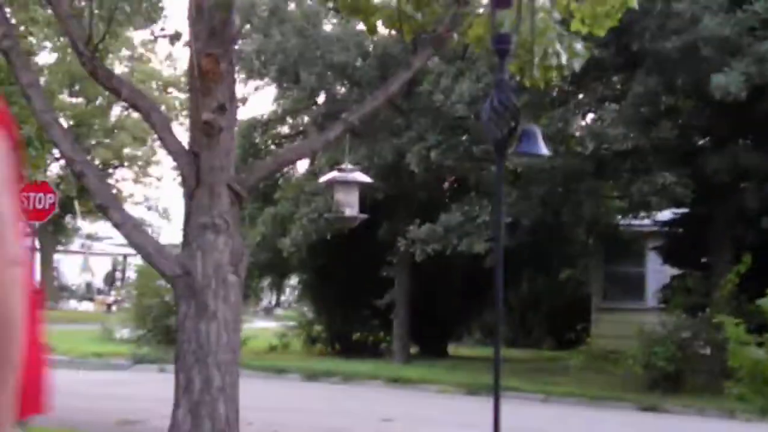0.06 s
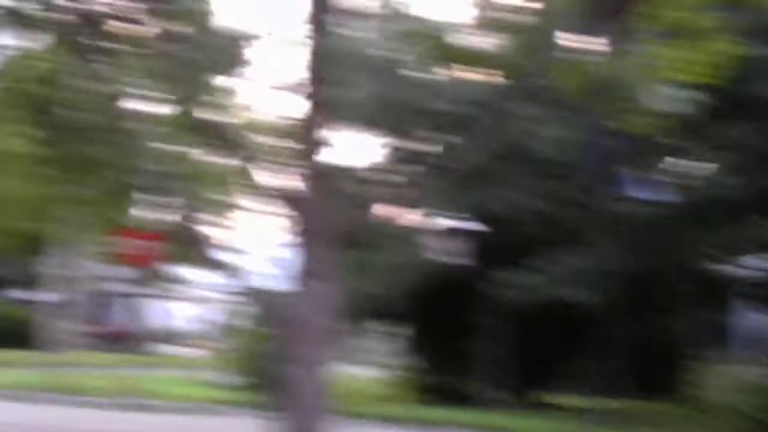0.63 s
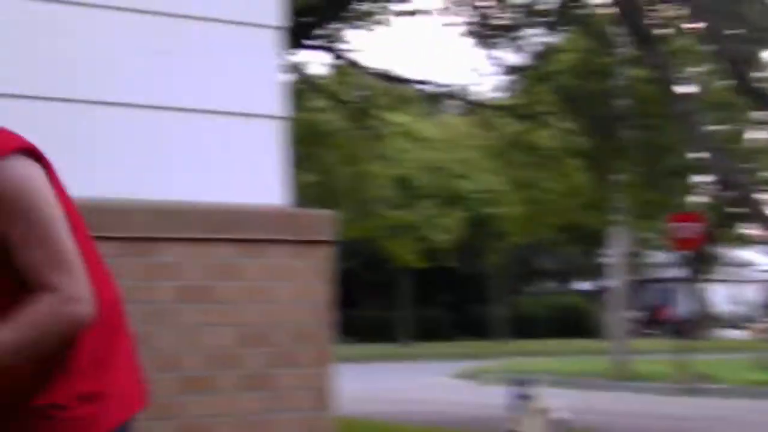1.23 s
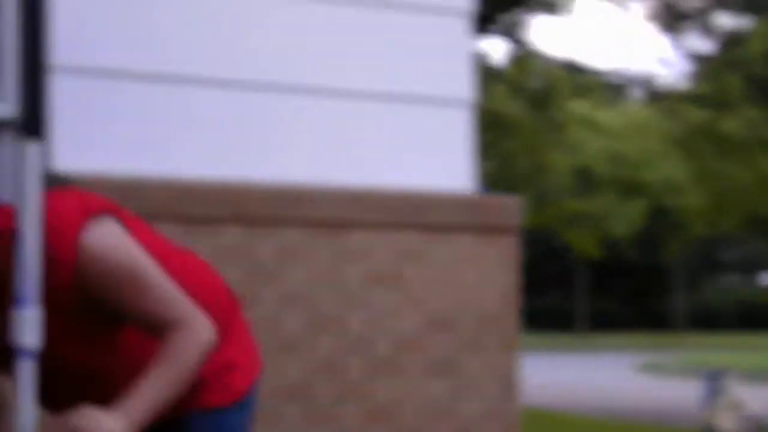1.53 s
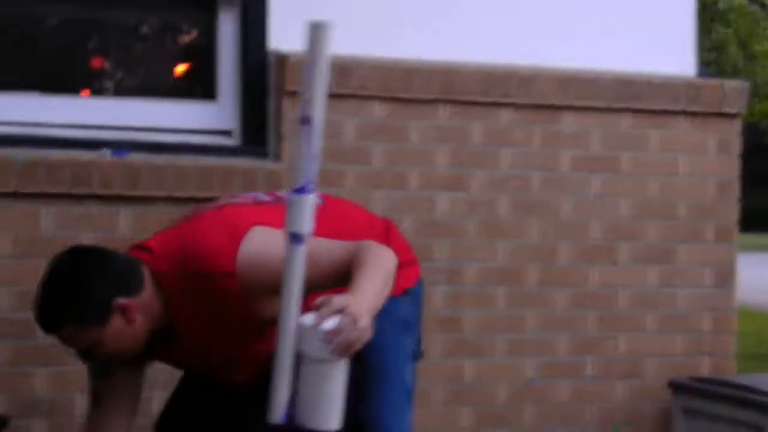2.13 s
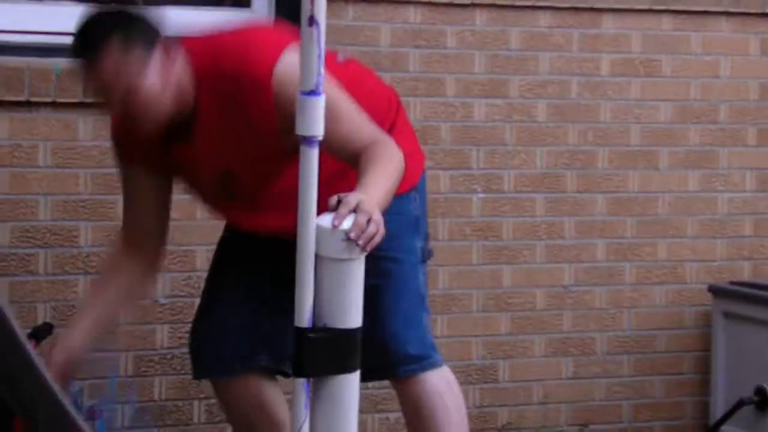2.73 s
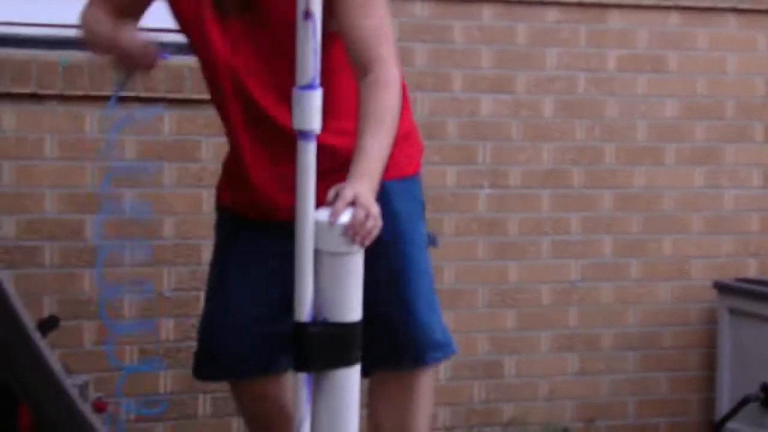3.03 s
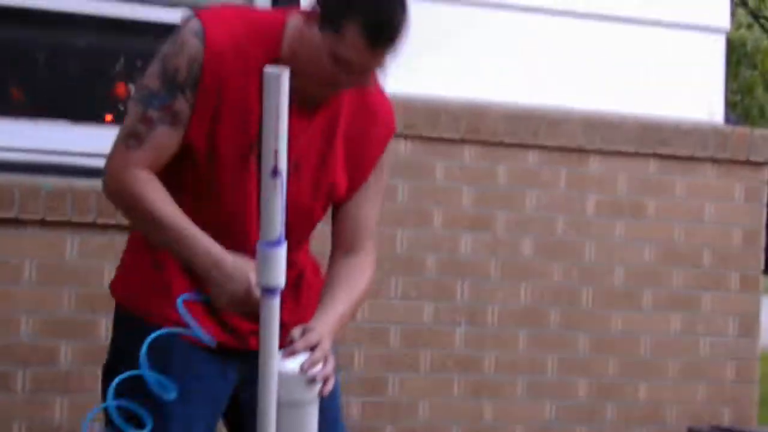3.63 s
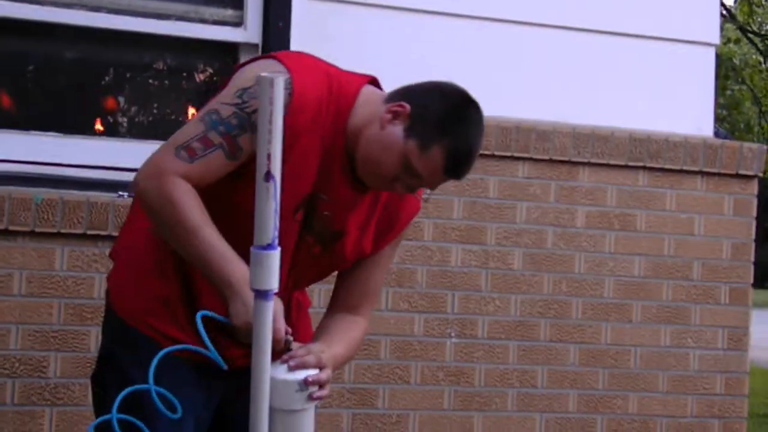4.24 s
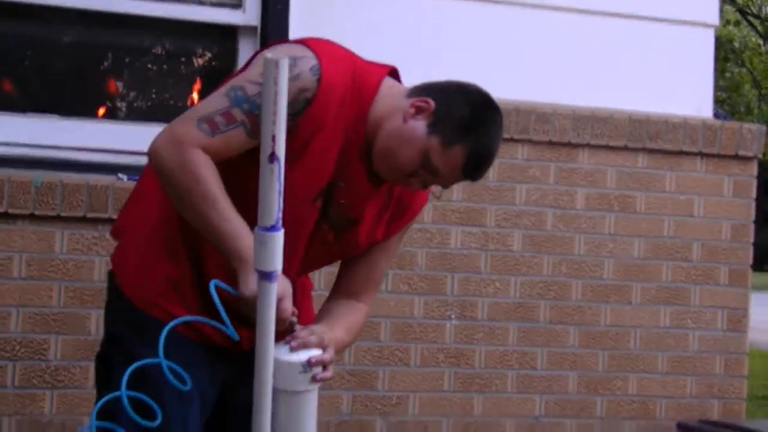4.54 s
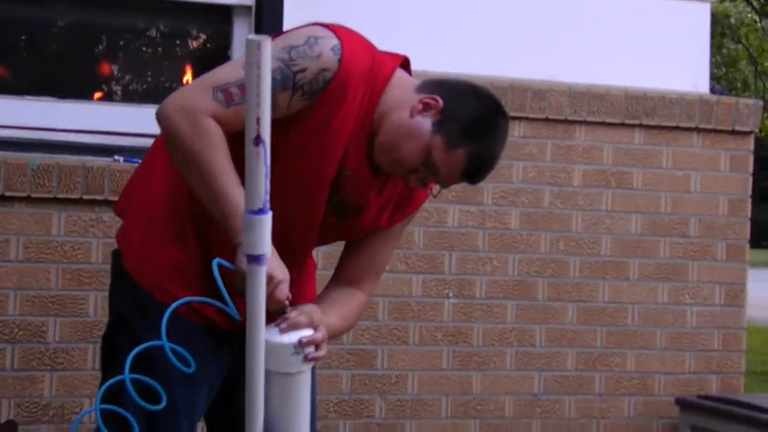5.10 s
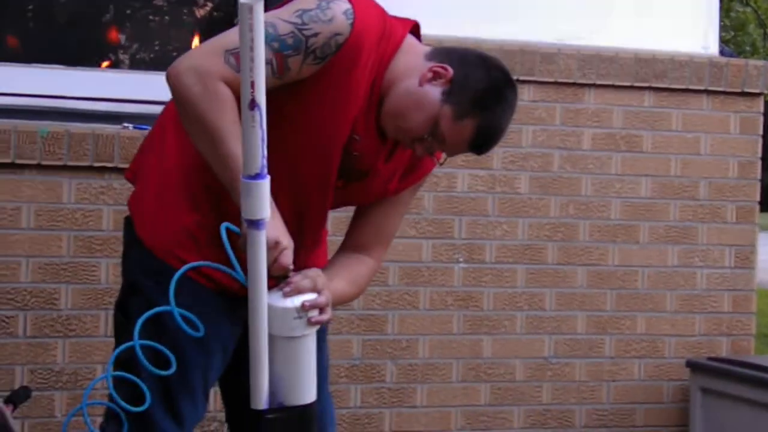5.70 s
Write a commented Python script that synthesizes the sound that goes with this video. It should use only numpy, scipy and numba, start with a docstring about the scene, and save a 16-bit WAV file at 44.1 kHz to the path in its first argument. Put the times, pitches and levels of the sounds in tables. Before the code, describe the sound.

Steady buzz and bright metallic rattle of an electric air compressor, with a few clicks and late spurts of escaping air.

```python
"""Small air compressor by a wall

A piston compressor runs outdoors beside a brick wall, about 87 strokes a second, while a hand-held
camera swings round to face it. The pump buzzes, its valve rings, its gear rattles and air rushes with
each stroke. Near the end air spits from the hose chuck as it is pressed on a pipe cannon, and the
camera's gain control ducks."""
import sys
import numpy as np
from scipy import signal
from scipy.fft import rfft, irfft, next_fast_len
from scipy.io import wavfile
from scipy.ndimage import uniform_filter1d
from numba import njit

SR = 44100
rng = np.random.default_rng(int(sys.argv[2]) if len(sys.argv) > 2 else 0)


def persist_wave(psi):
    """Save psi, clipped to +-1, as 16-bit WAV."""
    counts = np.round(np.clip(psi, -1, 1) * 32767).astype(np.int16)
    wavfile.write(sys.argv[1], SR, np.atleast_2d(counts).T)


N = 262836
T = np.arange(N) / SR


def undb(db):
    """Decibels to gain."""
    return 10 ** (np.asarray(db) / 20)


def unit(x):
    """Scale to rms 1."""
    return x / np.sqrt(np.mean(x ** 2))


def automation(points):
    """Straight ramps through (time, value) breakpoints."""
    return np.interp(T, *np.transpose(points))


def equalise(x, points):
    """Shape x with a (frequency, gain) EQ curve; rms 1."""
    hz, db = np.transpose(points)
    size = next_fast_len(N)
    bins_hz = np.maximum(np.fft.rfftfreq(size, 1 / SR), 1)
    gain = undb(np.interp(np.log(bins_hz), np.log(hz), db))
    return unit(irfft(rfft(x, size) * gain, size)[:N])


def resonate(x, hz, width_hz):
    """One resonance, gain 1 at its centre."""
    return signal.lfilter(*signal.iirpeak(hz, hz / width_hz, fs=SR), x)


def ring(knocks, hz, width_hz):
    """A struck metal part: the knocks pass twice through one resonance; rms 1."""
    return unit(resonate(resonate(knocks, hz, width_hz), hz, width_hz))


def drift(rate_hz):
    """Smooth random modulation, gliding between values of spread 1."""
    targets = rng.standard_normal(1024)
    step, fraction = np.divmod(T * rate_hz, 1)
    k = step.astype(int) % (len(targets) - 1)
    return targets[k] + (targets[k + 1] - targets[k]) * (1 - np.cos(np.pi * fraction)) / 2


def strokes(turns, jitter_s, scatter_db):
    """One sharp knock a turn, each a little early or late and of its own size."""
    count = int(turns[-1])
    lateness, size = rng.standard_normal((count, 2)).T
    position = (np.interp(np.arange(count), turns, T) + jitter_s * lateness) * SR
    taps = position.astype(int)[:, None] + np.arange(-7, 9)
    pulses = undb(scatter_db * size)[:, None] * np.sinc(taps - position[:, None])
    knocks = np.zeros(N)
    np.add.at(knocks, np.clip(taps, 0, N - 1), pulses)
    return knocks


# Motor speed: (time [s], stroke rate [Hz])
STROKE_RATE = [(0, 86.65), (.36, 87.03), (.9, 86.6), (1.08, 86.24), (1.35, 86.73), (2.28, 87.2),
               (2.55, 86.34), (2.75, 86.6), (2.95, 86.27), (3.7, 86.76), (4.12, 86.96), (4.4, 86.43),
               (4.8, 86.15), (5.4, 86.2), (5.65, 86.7), (5.96, 87)]

def crank():
    """Turns made so far by the crank, which sags a little under load."""
    return np.cumsum(automation(STROKE_RATE)) / SR


# The camera tips down towards the pump and back up: (time [s], aim [0-1])
CAMERA_AIM = [(1.5, 0.16), (2.05, 0.99), (3.05, 0.71), (3.7, 0.01)]

def perspective(away_db, facing_db, aimed_db=0, swing_start_s=1.08, swing_length_s=.65):
    """A layer's level in dB as the camera swings to face the wall and tips towards the pump."""
    facing = np.clip((T - swing_start_s) / swing_length_s, 0, 1)
    return away_db + (facing_db - away_db) * facing + aimed_db * automation(CAMERA_AIM)


def camera_shadow(x, above_hz=13100):
    """The camera's body shades the top of the treble, most while it is turned away."""
    top = signal.sosfiltfilt(signal.butter(4, above_hz, "high", fs=SR, output="sos"), x)
    return x + top * (undb(perspective(away_db=-12.5, facing_db=-8.2)) - 1)


def wall_echo(x, delay_s=.0022, sway_s=.000095, gain=.061):
    """The wall's reflection sways with the hand, a faint moving comb filter on the hiss."""
    reflection = np.interp(T - delay_s - sway_s * drift(2.5), T, x)
    return (x + gain * reflection) / np.sqrt(1 + gain ** 2)


# Handling hits: (time [s], peak [dB], pitch [Hz], bandwidth [Hz], decay [s])
HANDLING_HITS = [(1.642, -14, 2020, 398.7, 0.0051), (1.99, -30, 400, 700, 0.0055),
                 (5.007, -7, 8490, 7030, 0.0018), (5.538, -9, 11000, 5000, 0.0036)]

def handling_clicks():
    """The gear clicks as it is handled, each hit a noise burst into one resonance."""
    out = 0
    for start_s, peak_db, hz, width_hz, decay_s in HANDLING_HITS:
        envelope = (T >= start_s) * np.exp(-np.minimum(np.abs(T - start_s) / decay_s, 20))
        click = resonate(rng.standard_normal(N) * envelope, hz, width_hz)
        out = out + undb(peak_db) * click / np.abs(click).max()
    return out


# Partials of the whine: (harmonic [x stroke rate], level [dB], flutter depth [dB])
WHINE_PARTIALS = [(31, -39.5, 1), (66, -45, 4)]
# Fader ride on the whine: (time [s], gain [dB])
WHINE_FADER = [(0, 5), (.6, 5), (1.05, 0.5), (1.45, 10), (2.6, -12), (3.65, 2.5), (4.6, -2), (5.2, -15),
               (5.95, -2)]

def motor_whine(turns):
    """Two high partials of the motor, the upper one fluttering more."""
    out = 0
    for harmonic, db, flutter_db in WHINE_PARTIALS:
        flutter = undb(flutter_db * drift(90))
        tone = np.sin(2 * np.pi * (harmonic * turns + rng.random()))
        out = out + undb(db) * unit(flutter * tone)
    return out * undb(automation(WHINE_FADER))


# Fader ride on the housing's ring: (time [s], gain [dB])
HOUSING_FADER = [(0, -3), (2.2, -3.5), (2.42, 6), (2.68, -9), (3.5, -1), (4.35, 6), (4.75, -2), (5.3, -5),
                 (5.95, 4)]

def housing_ring(turns, trim_db=-37):
    """The piston's return rings the housing, half a turn after each valve slap."""
    knocks = strokes(turns + .5, jitter_s=.000012, scatter_db=1.2)
    return ring(knocks, hz=3118, width_hz=123) * undb(automation(HOUSING_FADER) + trim_db)


def valve_squeak(turns):
    """A thin, ragged squeak from the valve gap on each stroke, strongest before the camera turns."""
    kicks = strokes(turns - .7, jitter_s=.00004, scatter_db=3.5)
    squeak = ring(kicks, hz=10550, width_hz=400) + ring(kicks, hz=11000, width_hz=180)
    return unit(squeak) * undb(perspective(away_db=-30.5, facing_db=-38, aimed_db=2))


# Fader ride on the valve plate's ring: (time [s], gain [dB])
VALVE_FADER = [(0.0, -27), (0.51, -30), (0.81, -26), (1.03, -43), (1.21, -30), (1.68, -30), (1.76, -36.5),
               (2.42, -30.5), (2.92, -38), (3.27, -32), (3.37, -24), (3.42, -33), (3.82, -27.5),
               (4.61, -32), (4.93, -48), (5.18, -29), (5.53, -32.5), (5.96, -28)]

def valve_ring(turns, trim_db=1.5):
    """The valve plate slaps shut once a stroke and rings."""
    slaps = strokes(turns, jitter_s=.000012, scatter_db=1.66)
    return ring(slaps, hz=3977, width_hz=155) * undb(automation(VALVE_FADER) + trim_db)


# Spits of air at the chuck: (fully open at [s], hold [s], starting level [dB])
CHUCK_SPITS = [(4.459, .025, -22), (4.765, 0.24, -17.7), (5.096, .028, -20)]
# Bright EQ of the jet: (frequency [Hz], gain [dB])
JET_EQ = [(1000, -27), (4000, -40), (5200, -5), (6200, -4), (6900, 6), (7600, 3), (8700, 7), (9900, 1),
          (10400, 7), (11500, 2), (12300, 3), (13000, -9), (16000, 1)]

def chuck_leak(attack_s=.02, release_s=.007, swell_db_per_s=29, sputter_db=1.5):
    """Air sputters out until the chuck seats: each spit opens, swells with the push, is pinched off."""
    flow = 0
    for open_s, hold_s, db in CHUCK_SPITS:
        age = T - open_s
        opening = np.clip(1 + age / attack_s, 0, 1)
        closing = np.clip(1 - (age - hold_s) / release_s, 0, 1)
        flow = flow + opening * closing * undb(db + swell_db_per_s * np.clip(age, 0, hold_s))
    jet = equalise(rng.standard_normal(N), JET_EQ)
    return jet * flow * undb(sputter_db * drift(86))


# Broad EQ of the air drawn in: (frequency [Hz], gain [dB])
INTAKE_EQ = [(30, -49), (200, -25.5), (350, -26.5), (480, -12.5), (850, -17.5), (1300, -11), (1700, -14),
             (2000, -7), (2550, -16), (3400, -8), (4800, -4.5), (5250, -2.5), (7300, -3), (9500, -41)]
# Sizzling EQ of the air at the valve gaps: (frequency [Hz], gain [dB])
FIZZ_EQ = [(5000, -25), (7600, -1), (8600, 2.5), (9400, -2.5), (10100, -14), (10500, -3), (11200, -3),
           (12000, -6.5), (13500, -16.5), (14200, -8), (14450, -2.5), (14800, -16), (16000, -6.5)]

def air_rush(turns, swell_db=1.5, puff_db=1.5, flutter_db=.5):
    """Air swells through the intake once a stroke, then puffs from the valve gaps."""
    flutter = flutter_db * drift(60)
    swell = undb(swell_db * np.cos(2 * np.pi * (turns - .7)) + flutter)
    puff = undb(puff_db * np.cos(2 * np.pi * (turns - .8)) + flutter)
    intake = equalise(swell * rng.standard_normal(N), INTAKE_EQ)
    fizz = equalise(puff * rng.standard_normal(N), FIZZ_EQ)
    intake_db = perspective(away_db=-25.5, facing_db=-25)
    fizz_db = perspective(away_db=-25, facing_db=-23.5, aimed_db=.7)
    return intake * undb(intake_db) + fizz * undb(fizz_db)


# Metallic EQ of the piston and gear: (frequency [Hz], gain [dB])
RATTLE_EQ = [(1500, -56), (3100, -29), (3700, 3), (4300, 5.5), (4800, -6), (5230, 11.5), (5500, 10),
             (5800, 14), (6150, 9), (7300, 1), (8600, -18), (9600, 1.5), (11000, 2.5), (12300, -9),
             (16000, -28)]
# Fader ride on the rattle: (time [s], gain [dB])
RATTLE_FADER = [(0, -24.5), (.6, -25), (1.3, -22.5), (2.25, -27), (2.7, -25.5), (3.5, -24.5), (4.35, -25.5),
                (4.55, -24.5), (5.95, -25.5)]

def gear_rattle(turns, decay_s=.011, trim_db=-2, flare_at_s=2.9, flare_db=5.5, ring_db=-29):
    """Each stroke sets off a short clatter that shifts as the camera moves. It flares once, ringing."""
    knocks = strokes(turns, jitter_s=.000007, scatter_db=.8)
    age = T[:SR // 50]
    blend, power = 0, 0
    for _ in range(3):  # three clatter patterns, crossfaded at equal power
        pattern = rng.standard_normal(len(age)) * np.exp(-age / decay_s)
        weight = drift(2.53)
        blend = blend + weight * unit(signal.fftconvolve(knocks, pattern)[:N])
        power = power + weight ** 2
    clatter = equalise(blend / np.sqrt(power), RATTLE_EQ)
    flare_slope_s = np.where(T < flare_at_s, .098, .02)  # builds up, then drops away fast
    flare = np.exp(-np.abs(T - flare_at_s) / flare_slope_s)
    ringing = ring(knocks, hz=3640, width_hz=200) * flare * undb(ring_db)
    return clatter * undb(automation(RATTLE_FADER) + trim_db + flare_db * flare) + ringing


# Partials of the buzz: (harmonic [x stroke rate], level turned away [dB], level facing the wall [dB])
BUZZ_PARTIALS = [(1, -54, -53), (2, -69, -70), (3, -57, -58), (4, -41.5, -46.5), (5, -53, -42),
                 (6, -46, -47), (7, -49, -46), (8, -50, -42), (9, -38, -40), (10, -46, -47), (11, -55, -49),
                 (12, -61, -44), (13, -54, -38), (14, -38, -36), (15, -36, -45), (16, -51, -44),
                 (17, -43, -43), (18, -48, -49), (19, -41, -45), (20, -51, -49), (21, -49, -50),
                 (22, -47, -49), (23, -45, -43), (24, -41, -42), (25, -55, -52), (26, -47, -41),
                 (27, -39, -42), (28, -50, -51), (29, -54, -47), (30, -47, -52), (32, -43, -51),
                 (33, -50, -44), (34, -46, -49), (37, -46, -46), (38, -52, -49), (39, -45, -49),
                 (40, -55, -49), (41, -48, -44), (42, -46, -44), (43, -51, -46)]
# Pump body resonances: (frequency [Hz], boost turned away [dB], boost facing the wall [dB],
# extra aimed at the pump [dB], extra with the camera at rest [dB])
BODY_RESONANCES = [(467.2, -2, -1.5, 10.5, -1.5), (715, -0.5, 0, -1.5, 2), (1205.5, 1.5, -2.5, -3, 3.5)]

def pump_buzz(turns, resonance_octaves=.12, rest_start_s=3.43, rest_length_s=.36):
    """The pump body buzzes in harmonics of the stroke; each wavers as the wall's echo shifts."""
    body = np.array(BODY_RESONANCES)
    resting = np.clip((T - rest_start_s) / rest_length_s, 0, 1)  # the camera settles on the cannon
    # each harmonic peaks at its own moment in the turn, loosely tied to its neighbours
    phases = np.cumsum(.195 * rng.standard_normal(len(BUZZ_PARTIALS)))
    out = 0
    for (harmonic, away_db, facing_db), phase in zip(BUZZ_PARTIALS, phases):
        hz = harmonic * turns[-1] / T[-1]
        nearness = np.exp(-(np.log2(hz / body[:, 0]) / resonance_octaves) ** 2)
        away_boost, facing_boost, aimed_boost, rest_boost = nearness @ body[:, 1:]
        db = perspective(away_db + away_boost, facing_db + facing_boost, aimed_boost)
        # short waves waver more as the camera moves; the level steadies somewhat once it rests
        depth = min(np.sqrt(hz / 1150), 1.2)
        phase_drift = .12 * depth * drift(2.06)
        waver_db = 2.5 * depth * (1 - .34 * resting) * drift(6)
        tone = np.sin(2 * np.pi * (harmonic * turns + phase + phase_drift))
        out = out + undb(db + rest_boost * resting + waver_db) * tone
    return np.sqrt(2) * out


def scene():
    """One crank drives every compressor layer; spits and clicks join them in a mono mix."""
    turns = crank()
    hum = pump_buzz(turns) + motor_whine(turns)
    rings = valve_ring(turns) + housing_ring(turns) + valve_squeak(turns)
    hiss = camera_shadow(wall_echo(gear_rattle(turns) + air_rush(turns)))
    return np.tile(hum + rings + hiss + chuck_leak() + handling_clicks(), (2, 1))


@njit
def follow(power, attack, release):
    """Envelope follower with separate rise and fall speeds."""
    out, level = np.empty(len(power)), power[0]
    for i in range(len(power)):
        level += (power[i] - level) * (attack if power[i] > level else release)
        out[i] = level
    return out


def gain_control(x, threshold_db=-17, attack_s=.0033, release_s=.044):
    """Duck the whole mix while its level is over the threshold."""
    power = uniform_filter1d(x ** 2, SR // 100)
    envelope = follow(power, 1 / (attack_s * SR), 1 / (release_s * SR))
    return x / np.sqrt(np.maximum(envelope / undb(threshold_db) ** 2, 1))


def record(dry):
    """The microphone port cancels one narrow band; then gain control and a steep treble cut."""
    mono = dry.mean(axis=0)
    notched = mono - resonate(mono, hz=7890, width_hz=530)
    treble_cut = signal.ellip(12, .1, 80, 15700, fs=SR, output="sos")
    return np.tile(signal.sosfilt(treble_cut, gain_control(notched)), (2, 1))


dry = scene()
out = record(dry)
persist_wave(out)
```